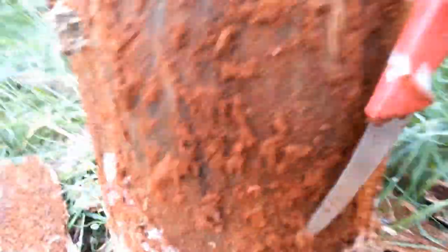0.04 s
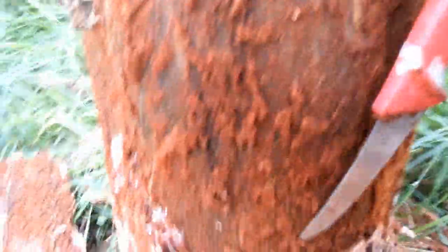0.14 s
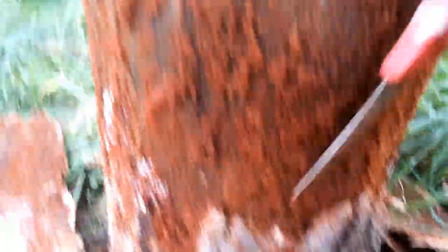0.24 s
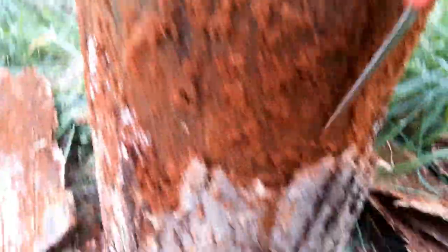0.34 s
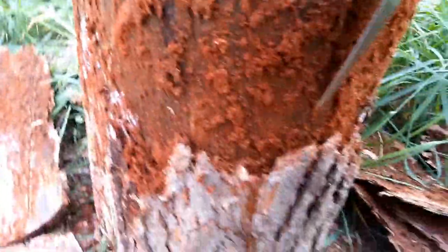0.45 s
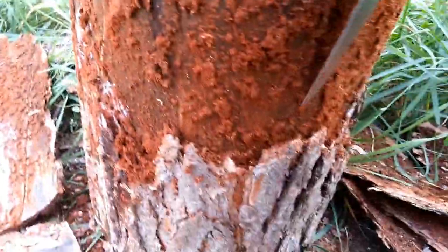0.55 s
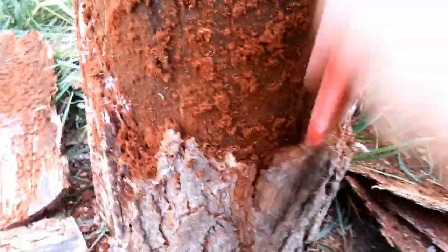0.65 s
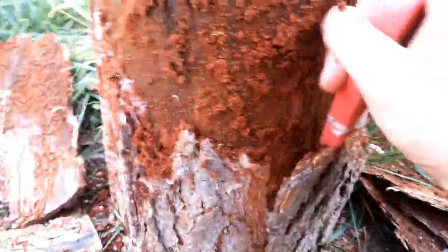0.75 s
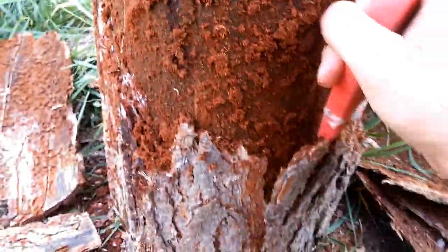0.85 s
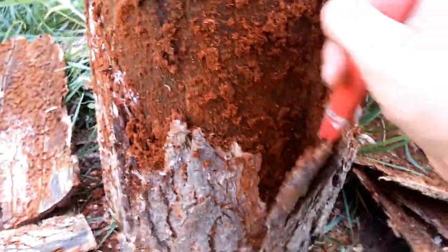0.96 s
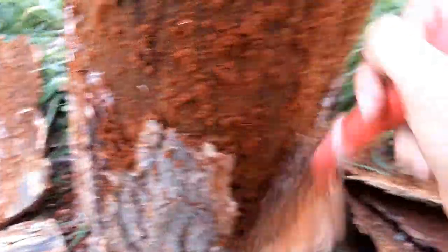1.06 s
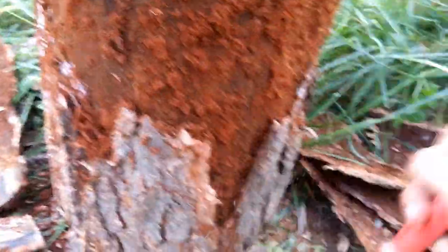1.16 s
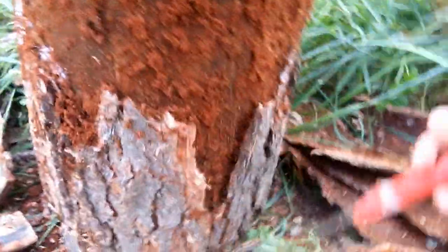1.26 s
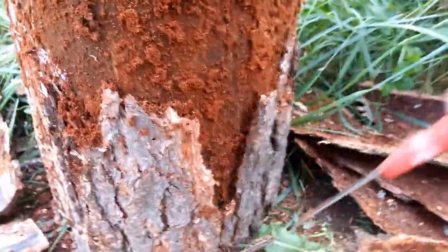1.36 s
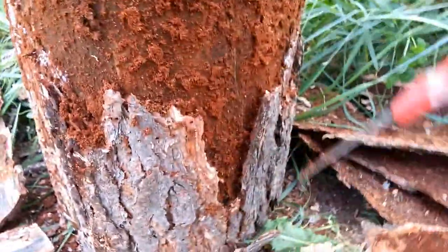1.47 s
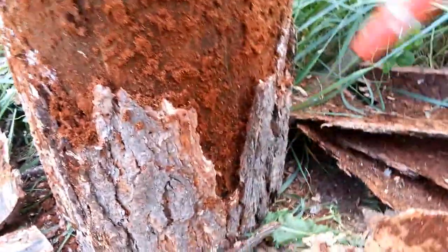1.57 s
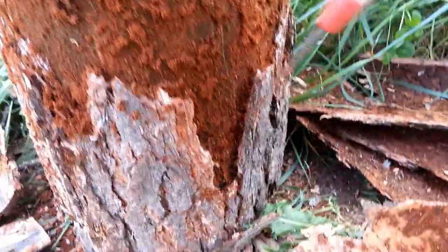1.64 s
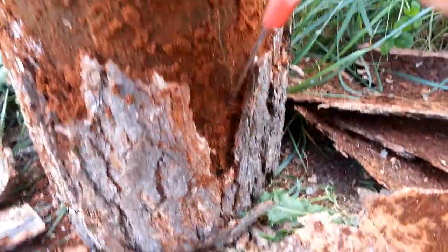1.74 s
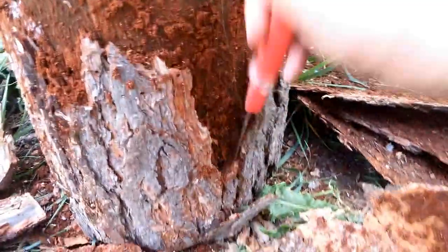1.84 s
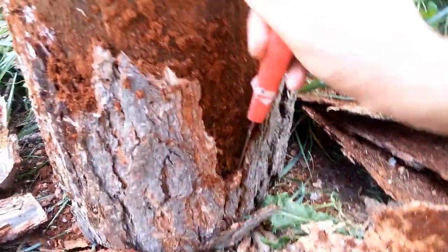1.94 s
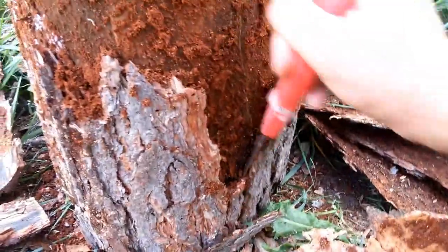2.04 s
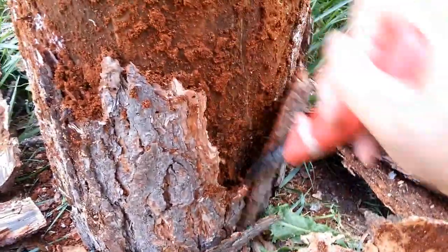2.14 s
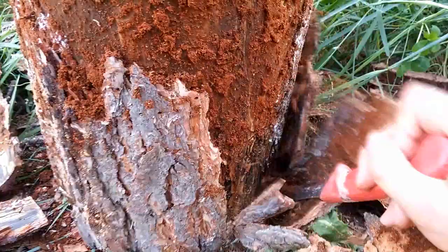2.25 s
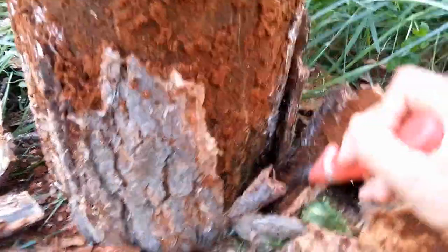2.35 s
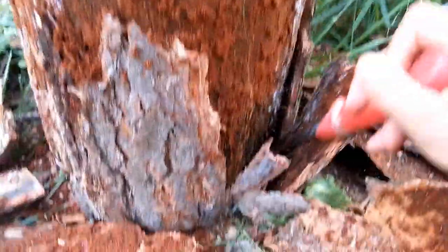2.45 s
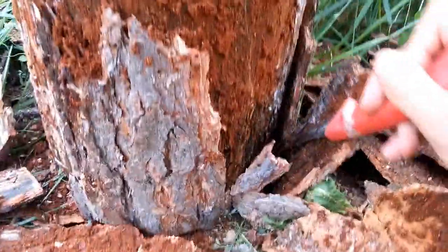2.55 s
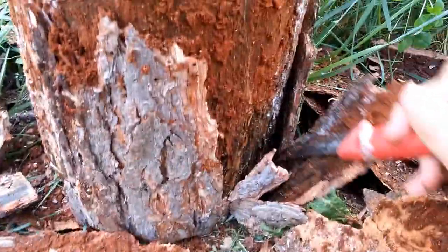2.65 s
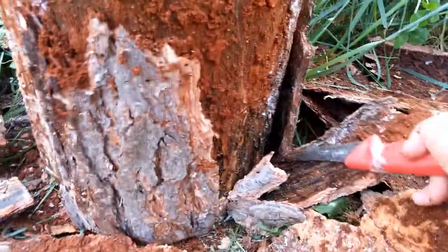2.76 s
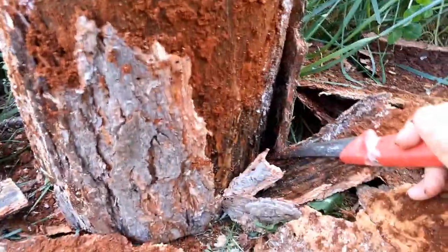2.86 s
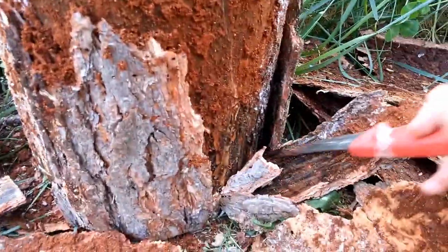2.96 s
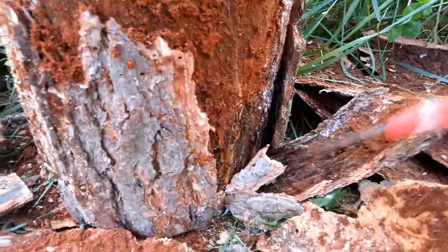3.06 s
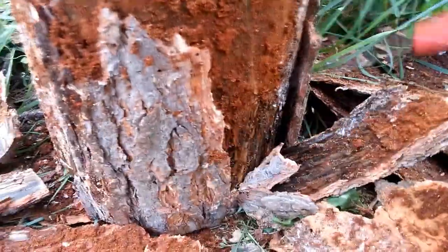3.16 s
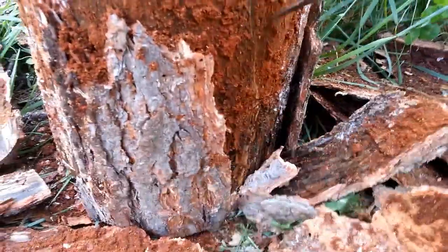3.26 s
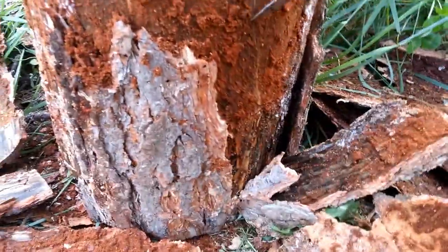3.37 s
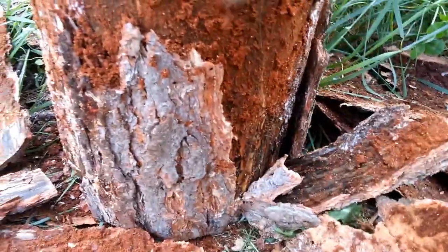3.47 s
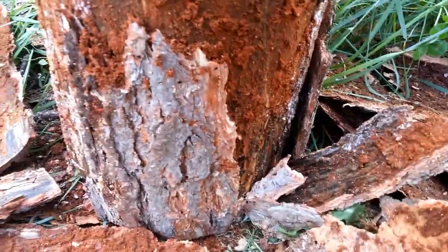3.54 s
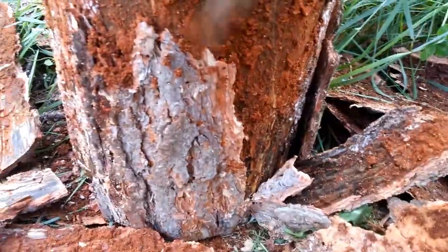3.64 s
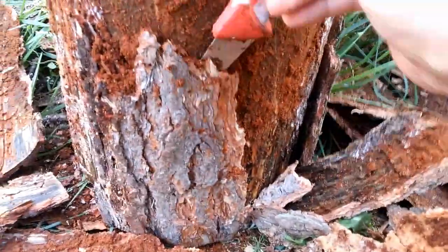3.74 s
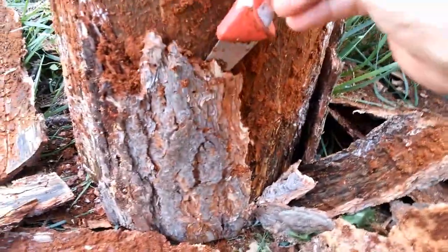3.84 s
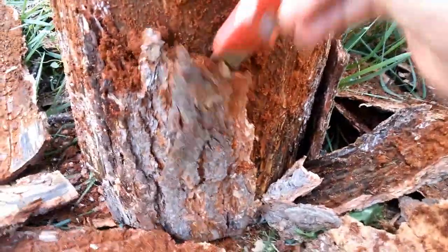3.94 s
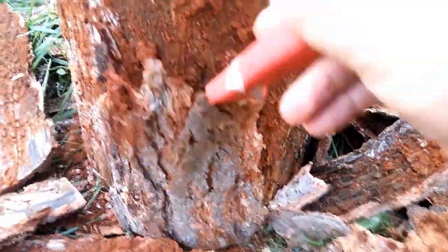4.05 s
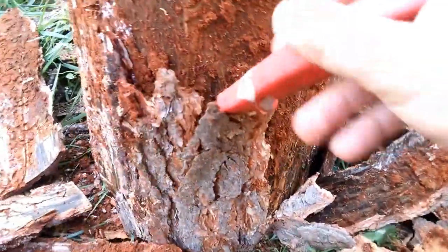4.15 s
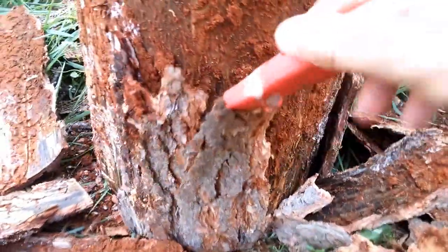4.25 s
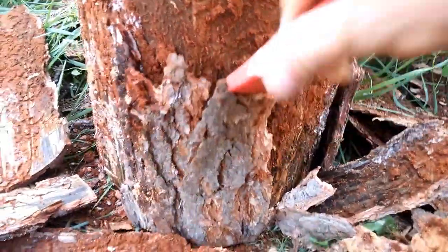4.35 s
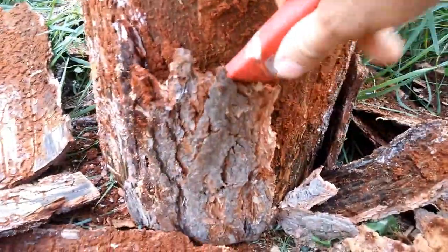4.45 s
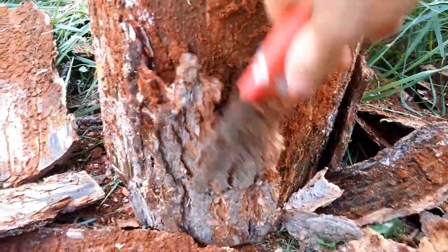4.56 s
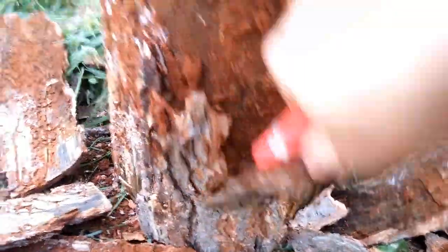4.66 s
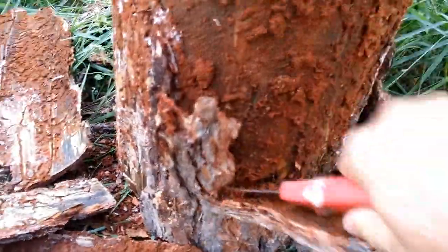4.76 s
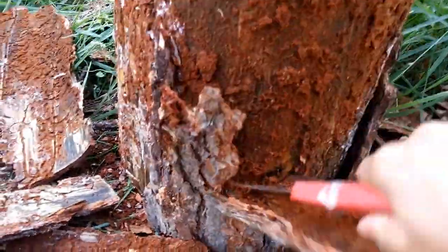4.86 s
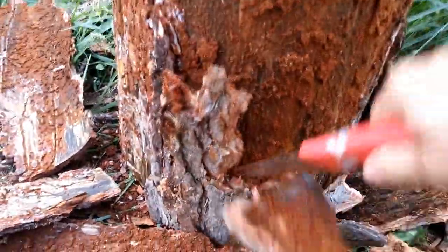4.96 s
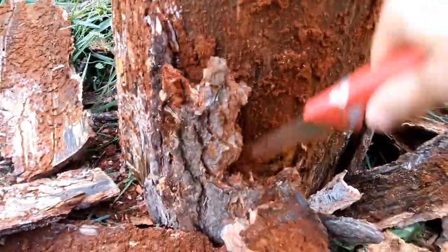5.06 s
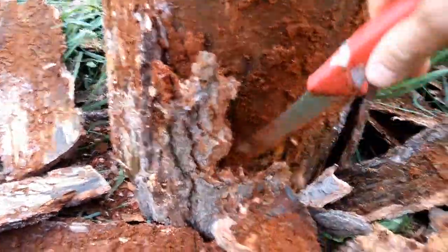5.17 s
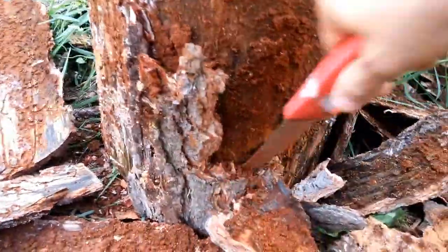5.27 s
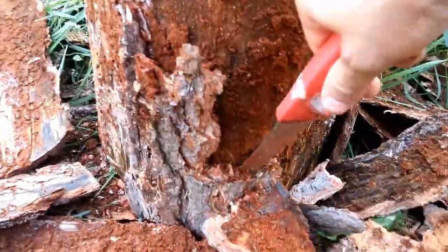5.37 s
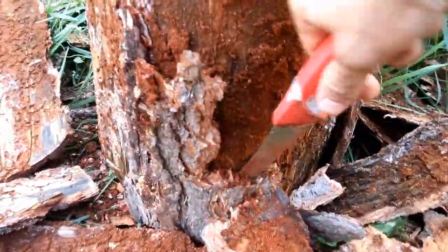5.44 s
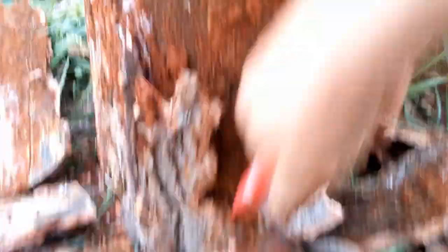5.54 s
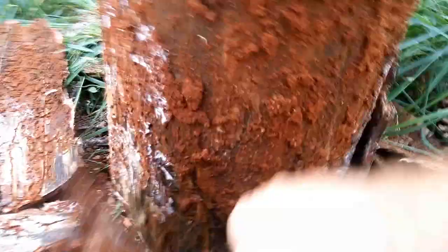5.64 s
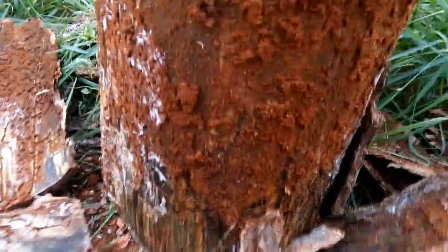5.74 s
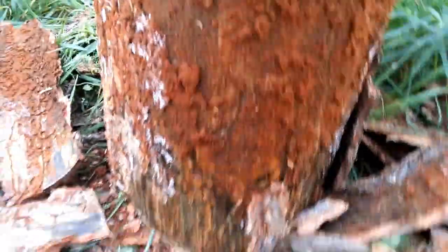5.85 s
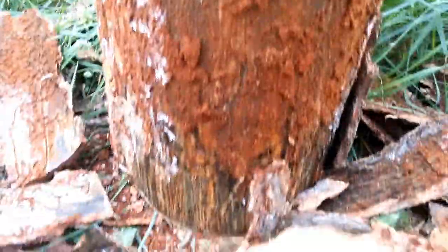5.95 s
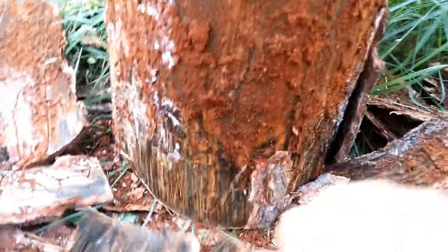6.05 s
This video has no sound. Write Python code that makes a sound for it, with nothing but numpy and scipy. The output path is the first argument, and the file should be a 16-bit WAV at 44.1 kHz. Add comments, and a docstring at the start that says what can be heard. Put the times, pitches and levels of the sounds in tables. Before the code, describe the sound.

Brittle bark cracks loose in short, irregular clusters, each a rough woody jolt mixed with gritty snapping fibres and low damped thuds. Between them come near-silence, faint rustle and small ticks. The sound is close, dry and wide, without echo, in a quiet wood; gentle breeze occasionally puffs low on the right side of the microphone. The last crack is sharpest and loudest.

```python
"""A blade tears and scrapes at dry bark on a dead stump, over the hush of the wood.
Fibres crackle and snap: rough jolts ring a damped slab, and bursts of hiss make the snaps.
A light breeze rumbles and puffs on the microphone ports, mostly the right: filtered noise and low swings.
Pieces of bark thud on the stump or the ground: short damped tones with a noisy rattle."""
import sys
import numpy as np
from scipy import signal
from scipy.fft import rfft, irfft, next_fast_len
from scipy.io import wavfile
from scipy.ndimage import uniform_filter1d

SR = 44100
rng = np.random.default_rng(int(sys.argv[2]) if len(sys.argv) > 2 else 0)


def store_wav(level_fs):
    """Save 16-bit WAV to argv[1]."""
    pcm = np.round(np.clip(np.atleast_2d(level_fs), -1, 1) * 32767)
    wavfile.write(sys.argv[1], SR, pcm.T.astype(np.int16))


N = 269185  # length in samples


def gain_of(db):
    """Turns decibels into a factor."""
    return 10 ** (np.asarray(db) / 20)


def evened(x):
    """Scales a signal to an rms (average strength) of 1."""
    return x / np.sqrt(np.mean(x ** 2) + 1e-20)


def read(points, hz):
    """Reads a curve between its points, on a log-frequency axis."""
    f, value = np.transpose(points)
    return np.interp(np.log(hz + 1), np.log(f + 1), value)


def add(mix, s, sound):
    """Mixes a sound in, starting at s seconds."""
    part = mix[round(s * SR):][:len(sound)]
    part += sound[:len(part)]


def coloured(x, points):
    """Gives a sound the shape of a spectrum without smearing it ahead in time; white noise keeps its power."""
    hz = abs(np.fft.fftfreq(4096, 1 / SR))
    log_gain = np.log(gain_of(np.maximum(read(points, hz), -100)))
    # the Hilbert transform supplies the phase that makes the filter answer only after its input
    taps = np.fft.ifft(np.exp(np.conj(signal.hilbert(log_gain)))).real[:2048]
    taps = taps / np.linalg.norm(taps)
    return signal.oaconvolve(x, taps[None], axes=1)[:, :N]


def wander(count, hz):
    """Makes slow random curves of rms 1, one row for each count, with little change faster than hz."""
    return evened(signal.lfilter(*signal.butter(2, hz, fs=SR), rng.standard_normal((count, N))))


def tearing(grains_per_s=6500., spread_db=4.0, clump_db=2.0, patchy_db=3.0, shared=0.6, peak_at=0.4, swell=1.29):
    """Tiny fibres part in clumps under the blade, each a click in the colour of the bark; crumbs trickle after."""
    # Swells of tearing and faint background rustle. Each row: start in seconds, length in seconds,
    # woody (low) level in dB, gritty (high) level in dB.
    swells = [(0.0, 0.19, -61.5, -58.5), (0.143, 0.53, -60.5, -64), (0.617, 0.14, -54.5, -49),
              (1.052, 0.025, -33.5, -34), (1.077, 0.069, -30.5, -28), (1.144, 0.039, -53, -32.5),
              (1.163, 0.18, -48, -50), (1.806, 0.11, -49.5, -52), (2.091, 0.3, -46.5, -42.5),
              (2.207, 0.064, -33.5, -28.5), (2.253, 0.058, -34.5, -36.5), (2.31, 0.19, -59, -64),
              (2.646, 0.16, -49.5, -52), (2.912, 0.041, -55, -54.5), (3.413, 0.13, -76, -60.5),
              (3.652, 0.08, -44.5, -52), (3.711, 0.052, -44, -47.5), (3.933, 0.086, -53, -45),
              (4.002, 0.029, -35.5, -36), (4.03, 0.11, -55.5, -52), (4.293, 0.039, -54, -40),
              (4.4, 0.29, -62, -60), (4.573, 0.21, -46, -36.5), (4.7, 0.038, -38, -27),
              (4.732, 0.49, -64, -61.5), (5.04, 0.082, -60, -49), (5.197, 0.12, -61, -57),
              (5.27, 0.067, -61, -47.5), (5.512, 0.13, -77, -41.5), (5.572, 0.12, -37.5, -30.5),
              (5.643, 0.069, -45.5, -49), (5.701, 0.13, -40.5, -40.5), (5.904, 0.44, -56.5, -57)]
    # The colour of tearing bark. Each row: frequency in Hz, power density in dB per Hz (relative).
    tear_colour = [(120, -14.5), (400, -3.5), (900, -0.5), (4000, -6), (9500, -6.5), (16000, -15)]

    excess = np.minimum(rng.exponential(1, (3, N)), 3.2)  # many small clicks, few big ones
    size = gain_of(spread_db * excess) * rng.standard_normal((3, N))
    grains = size * (rng.random((3, N)) < grains_per_s / SR)
    common = np.array([grains[0], np.roll(grains[0], 3)])  # three samples later on the right
    pair = shared * common + np.sqrt(1 - np.clip(shared, 0, 1) ** 2) * grains[1:]
    sound = coloured(pair * gain_of(clump_db * wander(count=1, hz=123)), tear_colour)

    # the colour drifts as the blade meets other fibres
    z = signal.stft(sound, nperseg=256)[2]
    patches = uniform_filter1d(rng.standard_normal(z.shape[:0:-1]), size=5, axis=0)
    patches = evened(uniform_filter1d(patches, size=7, axis=1))
    sound = signal.istft(z * gain_of(patchy_db * patches.T), nperseg=256)[1][:, :N]
    wood = signal.lfilter(*signal.butter(1, 2200, "low", fs=SR), sound)
    grit = signal.lfilter(*signal.butter(1, 2200, "high", fs=SR), sound)

    level = np.zeros((2, N))
    for s, length, wood_db, grit_db in swells:
        way = np.linspace(0, 1, int(length * SR))
        rise_and_fall = np.interp(way, [0, np.clip(peak_at, 0, 1), 1], [0, 1, 0])
        shape = np.sin(np.pi / 2 * rise_and_fall) ** swell
        add(level[0], s, gain_of(wood_db) * shape)
        add(level[1], s, gain_of(grit_db) * shape)

    crumb_s, crumb_db = .035, -16  # fading time and level of the trickle of crumbs
    keep = np.exp(-1 / (crumb_s * SR))
    level = level + gain_of(crumb_db) * signal.lfilter([1 - keep], [1, -keep], level)
    return evened(wood) * level[0] + evened(grit) * level[1]


def hush(level_db=-56.5, patchy_db=.8):
    """Distant leaves and air blend into a steady hiss: random short-time spectra with drifting patches."""
    # The colour of the hush. Each row: frequency in Hz, power density in dB per Hz (relative).
    hush_colour = [(18, -24), (30, 2), (48, -9), (210, -0.5), (512, -9), (1040, -7), (1320, -12.5),
                   (1720, -10.5), (1910, -12), (5040, -18), (7670, -26.5), (9220, -20.5), (16000, -39)]
    # How alike left and right are. Each row: frequency in Hz, likeness (1 same, 0 unrelated, -1 opposite).
    likeness = [(60, 1), (380, 0.67), (2380, -0.26), (15000, 0.25)]

    frames, hz = N // 256 + 5, np.fft.rfftfreq(1024, 1 / SR)
    a, b, c, d, patches = rng.standard_normal((frames, 513, 5)).T
    patches = evened(uniform_filter1d(uniform_filter1d(patches, 12, 0), 14, 1))
    same = np.clip(read(likeness, hz), -1, 1)[:, None]
    left = a + 1j * b
    right = same * left + np.sqrt(1 - same ** 2) * (c + 1j * d)
    z = np.array([left, right])
    z *= gain_of(read(hush_colour, hz)[:, None] + patchy_db * patches)
    return gain_of(level_db) * evened(signal.istft(z, nperseg=1024, noverlap=768)[1][:, :N])


def cracks(shared=0.87, jolt_life=0.26, rise_s=0.0013, creep_db=-25.0, kick=5.5, thin=.55):
    """A rough jolt shakes the damped slab; a hissy snap dies with it. Each reaches the two ports a little apart."""
    # Cracks; rows about a millisecond apart are layers of one crack. Each row: time in seconds,
    # ring peak in dB before the last filters, slab pitch in Hz, snap level in dB before its colouring.
    crack_layers = [(0.08, -38, 2400, -48), (0.331, -44.5, 1050, -58), (0.717, -27, 740, -34),
                    (0.936, -43.5, 1310, -56), (1.0496, -28, 785, -16), (1.0605, -19, 1940, -31),
                    (1.0953, -16.5, 1310, -21), (1.122, -12.5, 1400, -4), (1.1941, -21.5, 2320, -15),
                    (1.263, -49, 1800, -35), (1.3689, -38.5, 965, -36), (1.6077, -28.5, 4470, -63),
                    (1.6593, -32.5, 2420, -56), (1.8997, -32.5, 2510, -57), (2.123, -45, 4160, -35),
                    (2.1535, -35, 1350, -25), (2.1694, -34, 830, -26), (2.18, -18.5, 833, -12.5),
                    (2.2065, -20.5, 830, -10), (2.2446, -11.5, 1310, -11), (2.2455, -11.5, 2460, -36),
                    (2.25, -9.5, 2710, -24), (2.2856, -19, 860, -20), (2.299, -27, 2000, -37),
                    (2.3656, -34, 2300, -35), (2.6768, -33, 1520, -31), (2.6905, -26, 2110, -25),
                    (2.7159, -24, 1850, -25.5), (2.7645, -55, 1850, -19), (2.8026, -28.5, 1780, -41),
                    (3.687, -23.5, 2290, -43), (3.9503, -28, 1370, -20), (3.96, -38, 1430, -34),
                    (3.9758, -11, 1450, -16), (3.981, -16, 4170, -40), (3.99, -15.5, 1380, -33),
                    (4.0182, -21, 1460, -30), (4.034, -17, 1450, -25), (4.043, -9, 1483, -21),
                    (4.0545, -30, 1400, -42), (4.0739, -31, 1960, -34.5), (4.3155, -31, 2000, -29),
                    (4.4442, -48.5, 1160, -26.5), (4.5846, -36, 1490, -33), (4.6051, -15.5, 1580, -15.5),
                    (4.6161, -11.5, 1530, -20), (4.6318, -19, 1230, -36), (4.642, -19, 1410, -5),
                    (4.658, -20, 1960, -8), (4.682, -25, 2020, -0.5), (4.6907, -22, 2750, -13),
                    (4.7164, -14.5, 856, -5.5), (4.7446, -28, 4360, -26), (4.8015, -31, 5100, -34),
                    (4.8146, -30, 4700, -37), (4.835, -47, 4700, -36), (4.875, -40, 1190, -58),
                    (4.8937, -28.5, 4260, -20), (4.9183, -45, 640, -29), (4.988, -45, 4020, -39),
                    (5.31, -32, 4630, -39), (5.411, -56, 1100, -32), (5.459, -60.5, 906, -24),
                    (5.5416, -28, 4640, -20), (5.5516, -30, 4880, -18), (5.5678, -32, 2130, -27),
                    (5.5957, -9, 2220, -19.5), (5.6055, -12, 2020, -42), (5.616, -9.5, 2170, -30),
                    (5.6244, -43, 2120, 11), (5.628, -1.5, 2310, -9.5), (5.6295, -4.5, 3780, -29),
                    (5.634, -5, 4000, -29), (5.6458, -12, 2140, -36), (5.66, -9, 2870, -31.5),
                    (5.7844, -39, 900, -32), (5.8578, -26.5, 1340, -14)]
    # Ways a bark slab vibrates. Each row: ratio to the slab pitch, strength in dB.
    slab_modes = [(1.011, -5), (0.57, -16.5), (1.287, -17.5), (1.66, -14), (2.75, -17)]
    # The colour of a snap. Each row: frequency in Hz, power density in dB per Hz (relative).
    snap_colour = [(290, -49), (500, -8), (1360, -2.5), (3490, -3.5), (6610, 2), (7980, -5.5), (9630, 3.5),
                   (16000, -23)]

    # T60 is the time to fall by 60 dB; the more a break rings rather than snaps, the longer it lasts
    break_t60_s, woody_stretch, woody_top_db = 0.022, 0.55, 14
    cycles, damped = 30., .17  # slab swings per T60 at 0 dB, and how much lighter breaks shorten them
    lead, lag_s, creep_s = 400, .00007, .0025  # samples before the break, spread between ports, creak time
    t = np.arange(2600) / SR
    from_break = t - lead / SR
    after = np.maximum(from_break, 0)
    rise = 1 - np.exp(-after / rise_s)
    creep = gain_of(creep_db) * np.exp(-abs(from_break) / creep_s)  # the fibre creaks before it gives
    ring, snap = np.zeros((2, 2, N))
    other = np.sqrt(1 - np.clip(shared, 0, 1) ** 2)

    for s, ring_db, hz, snap_db in crack_layers:
        t60 = break_t60_s * gain_of(woody_stretch * min(ring_db - snap_db, woody_top_db))
        ring_t60 = cycles * gain_of(damped * ring_db) / hz  # small pieces and light breaks die sooner
        noise = rng.standard_normal((4, len(t)))
        lag = lag_s * rng.standard_normal()
        detune = np.r_[1, rng.uniform(0.923, 1.167, 9)]  # every mode but the first is randomly detuned
        modes = np.zeros(len(t))
        for (ratio, db), d in zip(slab_modes, detune):
            fade = gain_of(db - 60 * t * np.sqrt(ratio) / ring_t60)
            modes += fade * np.sin(2 * np.pi * hz * ratio * d * t)

        jolt = noise[0] * (rise * gain_of(-60 * after / (jolt_life * t60)) + creep)
        jolt[lead] += kick  # the break itself is one sharp kick
        thinner = signal.butter(2, thin * hz, "high", fs=SR)  # small pieces sound without bass
        body = signal.lfilter(*thinner, signal.fftconvolve(jolt, modes)[:len(t)])
        noise = signal.lfilter(*thinner, noise)
        fall = rise * gain_of(-60 * after / t60) + creep
        for port in range(2):
            at = s - lead / SR + lag * (port - .5)
            hiss = shared * noise[1] + other * noise[2 + port]
            add(ring[port], at, gain_of(ring_db) * body / abs(body).max())
            add(snap[port], at, gain_of(snap_db) * fall * hiss)

    # a small, lossy slab gives off little bass or treble
    radiated = signal.sosfilt(signal.butter(2, [650, 6000], "band", fs=SR, output="sos"), ring)
    return radiated + coloured(snap, snap_colour)


def wind(lumpy_db=4.0, left_db=-20.0, low_hz=60, high_hz=150, puff_s=0.0018):
    """Eddies rumble on each port separately, more on the right; a puff is a single low swing."""
    # Rumble on the right port. Each row: time in seconds, level in dB.
    breeze = [(0, -93), (.56, -60), (1.0, -71), (1.45, -49), (1.65, -78), (2.07, -61), (2.5, -72),
              (3.35, -50.5), (3.6, -75), (3.9, -50.5), (4.2, -65), (4.45, -49.5), (4.8, -79), (5.27, -50.5),
              (5.52, -81), (5.86, -49), (6.1, -55)]
    # Puffs of air on the exposed right port. Each row: time in seconds (just ahead of the peak), peak in dB.
    air_puffs = [(1.796, -30.5), (2.961, -33), (3.22, -32.5), (3.304, -38.5), (3.869, -36.5), (4.075, -29),
                 (4.326, -23.5), (5.071, -42), (5.111, -35), (5.669, -34), (5.855, -28), (5.938, -36)]

    s, db = np.transpose(breeze)
    band = signal.butter(2, [low_hz, high_hz], "band", fs=SR, output="sos")
    rumble = signal.sosfilt(band, rng.standard_normal((2, N)))
    out = evened(evened(rumble) * gain_of(lumpy_db * wander(count=2, hz=7.3)))
    out = out * gain_of(np.interp(np.arange(N) / SR, s, db) + [[left_db], [0]])
    u = (np.arange(800) - 400) / SR / puff_s
    swing = (1 - u ** 2) * np.exp(-u ** 2 / 2)
    for s, db in air_puffs:
        add(out[1], s - 250 / SR, -gain_of(db) * swing)
    return out


def thuds(upper_db=-6.5, lower_db=-9.5, sag=0.035, rough_db=-20.0):
    """Dull knocks: three damped modes whose pitch sags after the blow, and a rough rattle of loose bark."""
    # Bark knocks on the stump or the ground. Each row: start in seconds, main tone's level in dB
    # before it rises and fades, pitch in Hz.
    knocks = [(0.714, -38.5, 326), (1.092, -30, 314), (1.107, -21, 616), (1.166, -34, 228),
              (1.19, -17, 340), (1.22, -20, 229), (1.263, -23, 338), (1.289, -33.5, 390), (2.206, -18, 654),
              (2.244, -16, 313), (2.255, -25.5, 164), (2.283, -25, 262), (2.672, -37, 242),
              (2.713, -34.5, 168), (3.022, -33, 344), (4.055, -34.5, 245), (4.909, -38, 434),
              (5.075, -40, 317), (5.11, -45, 260), (5.629, -27, 320), (5.764, -37, 200)]

    t, out = np.arange(5000) / SR, np.zeros(N)
    upper, lower = 2.3, .45  # ratios to the pitch
    for s, db, hz in knocks:
        t60 = 11.8 / hz  # about 12 swings until the knock has died by 60 dB
        turns = hz * (t + sag * 0.0016 * (1 - np.exp(-t / 0.00051)))  # starts sharp, then settles
        modes = np.sin(2 * np.pi * turns)
        modes = modes + gain_of(upper_db) * np.sin(2 * np.pi * (upper * turns + rng.random()))
        modes = modes + gain_of(lower_db) * np.sin(2 * np.pi * lower * turns)
        band = signal.butter(2, [hz, 4 * hz], "band", fs=SR)
        rattle = signal.lfilter(*band, rng.standard_normal(len(t)))
        shape = gain_of(db - 60 * t / t60) * (1 - np.exp(-t / 0.00068))
        add(out, s, -shape * (modes + gain_of(rough_db) * evened(rattle)))
    return signal.lfilter(*signal.butter(2, 110, "high", fs=SR), out)


def scene():
    """Adds up the work at the stump, the hush of the wood and the breeze."""
    return tearing() + hush() + cracks() + wind() + thuds()


def record(dry):
    """The two ports differ in colour; bass rolls off, peaks clip at full scale, and the top treble is cut."""
    # Colour difference of the ports. Each row: frequency in Hz, left minus right in dB.
    port_tilt = [(60, -8), (120, 6), (240, -2.0), (480, -2), (950, -1.5), (1890, 1), (3770, -2), (7520, -5),
                 (15000, 0)]

    size = next_fast_len(N)
    tilt = read(port_tilt, np.fft.rfftfreq(size, 1 / SR))
    x = irfft(rfft(dry, size) * gain_of([tilt / 2, -tilt / 2]), size)[:, :N]
    x = signal.sosfilt(signal.butter(3, 50, "high", fs=SR, output="sos"), x)
    x = np.clip(x, -1, 1)
    treble_cut = signal.firwin(511, 16200, window=("kaiser", 9), fs=SR)  # cutoff in Hz
    return signal.oaconvolve(x, treble_cut[None], "same")


dry = scene()
out = record(dry)
store_wav(out)
```